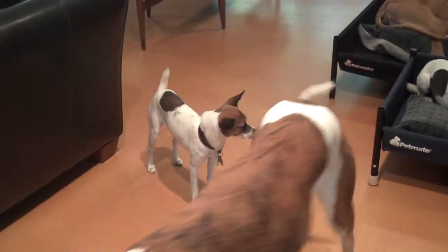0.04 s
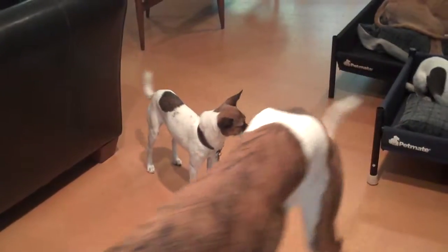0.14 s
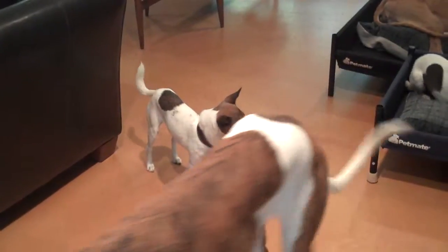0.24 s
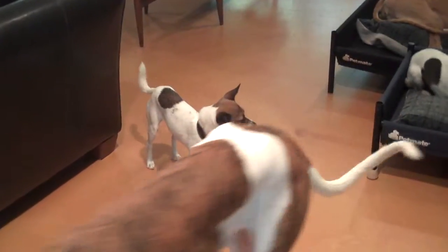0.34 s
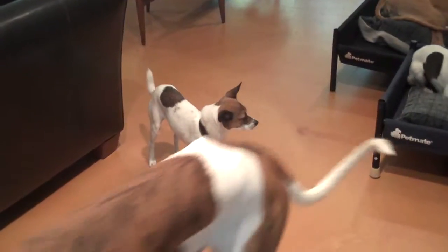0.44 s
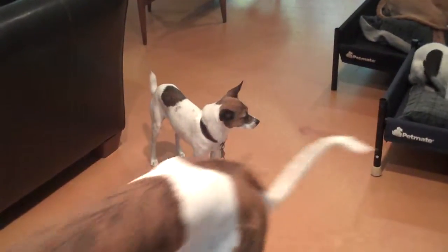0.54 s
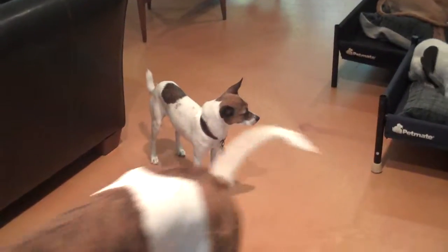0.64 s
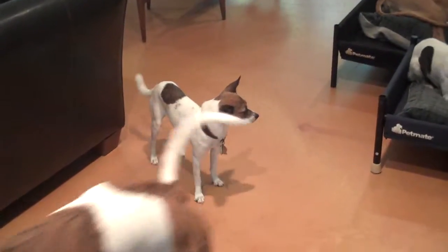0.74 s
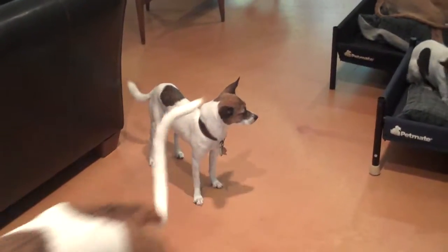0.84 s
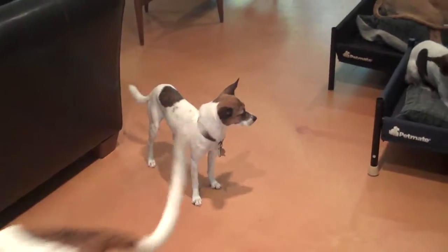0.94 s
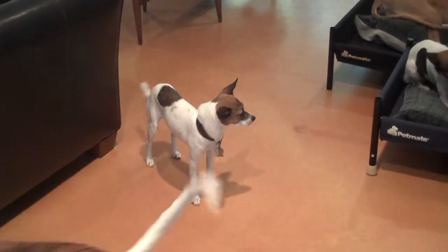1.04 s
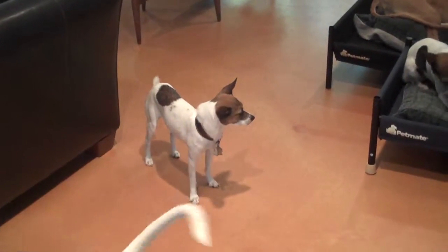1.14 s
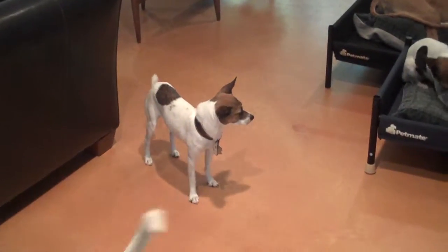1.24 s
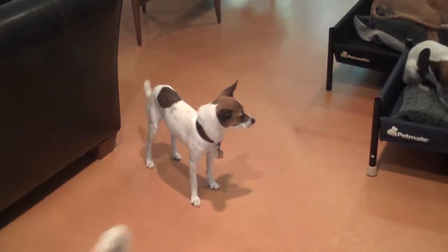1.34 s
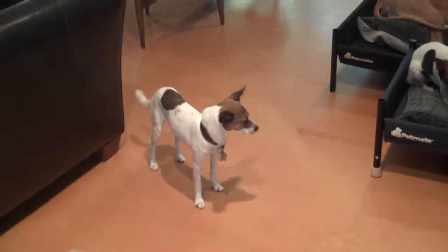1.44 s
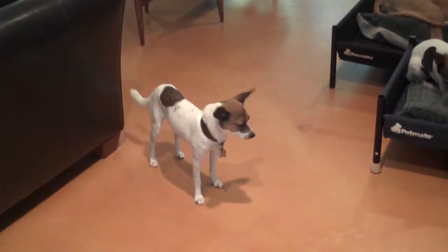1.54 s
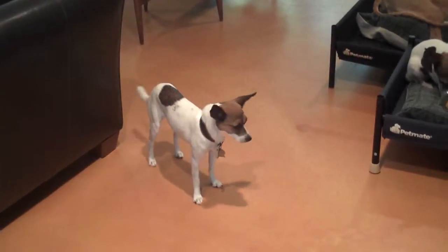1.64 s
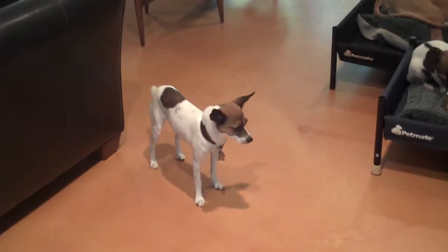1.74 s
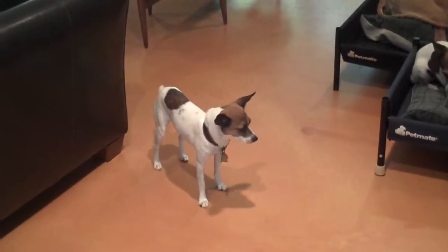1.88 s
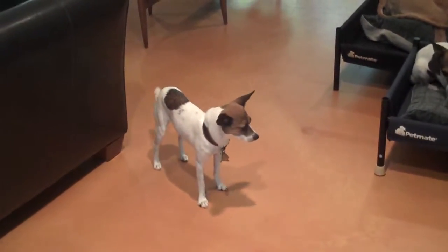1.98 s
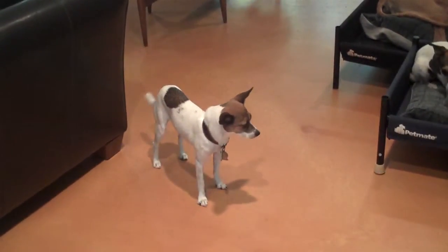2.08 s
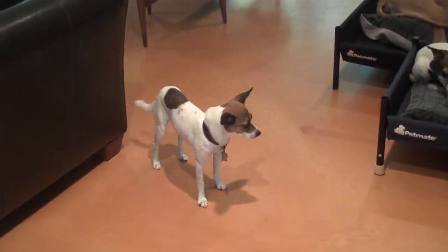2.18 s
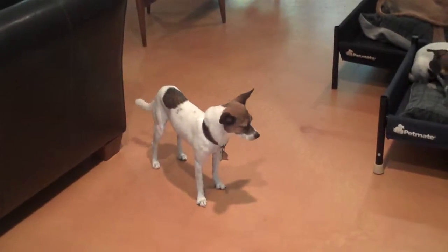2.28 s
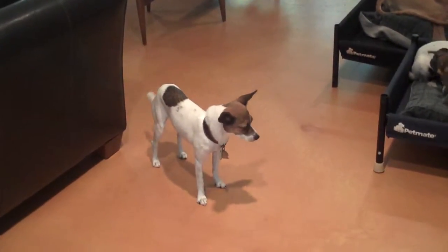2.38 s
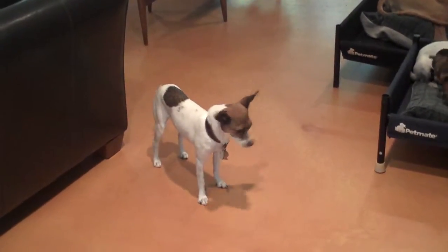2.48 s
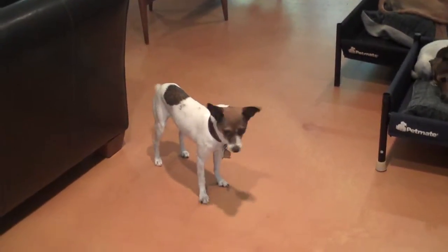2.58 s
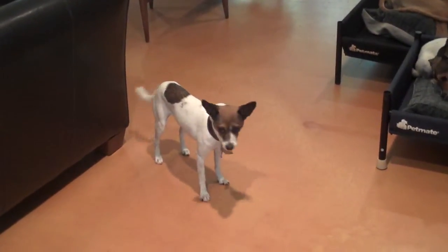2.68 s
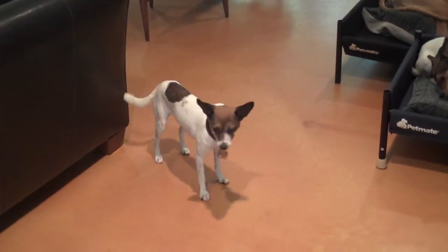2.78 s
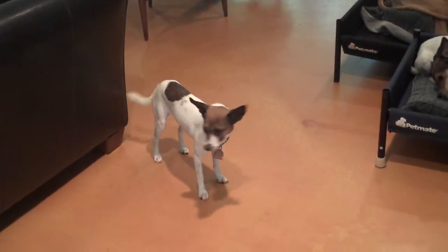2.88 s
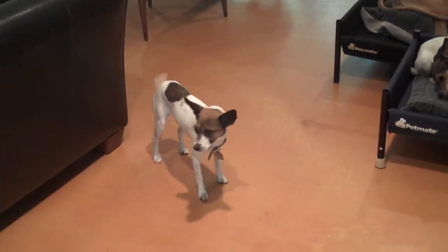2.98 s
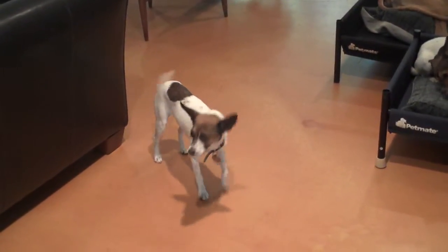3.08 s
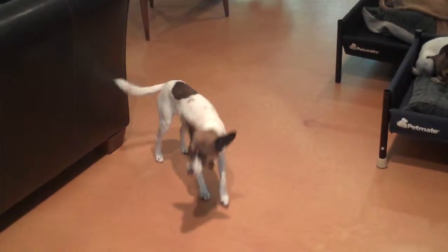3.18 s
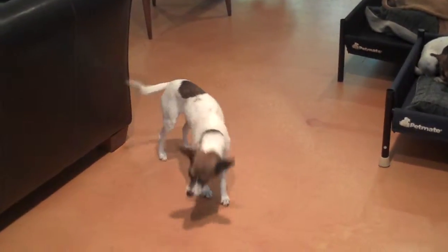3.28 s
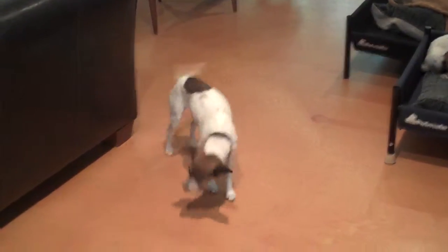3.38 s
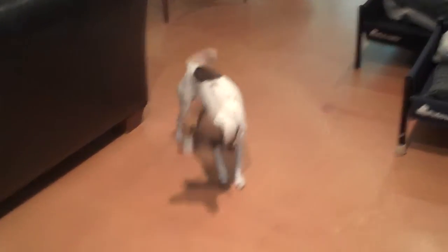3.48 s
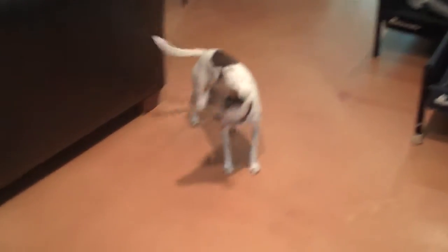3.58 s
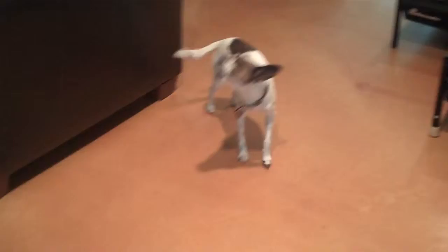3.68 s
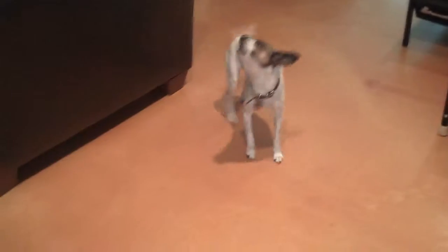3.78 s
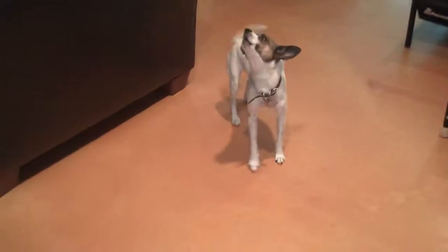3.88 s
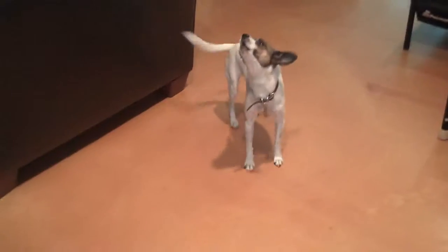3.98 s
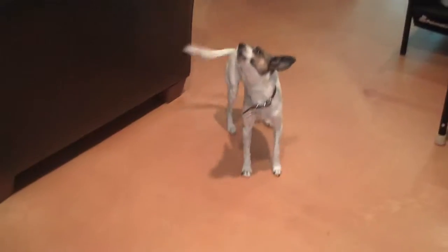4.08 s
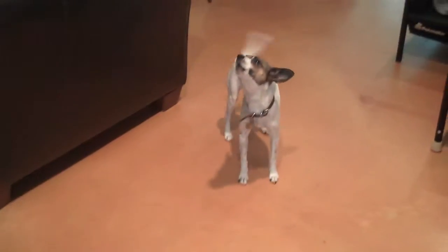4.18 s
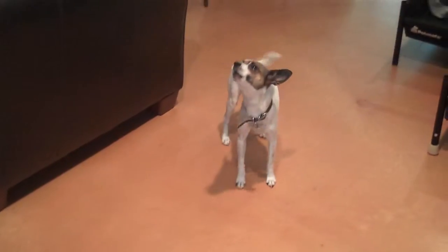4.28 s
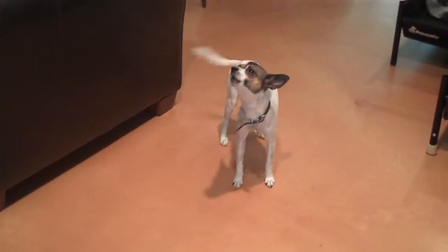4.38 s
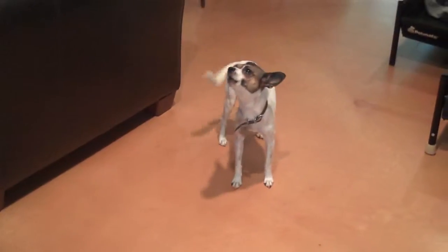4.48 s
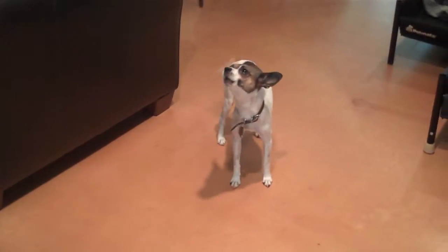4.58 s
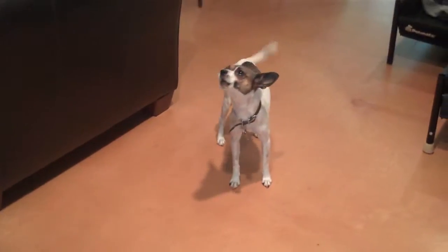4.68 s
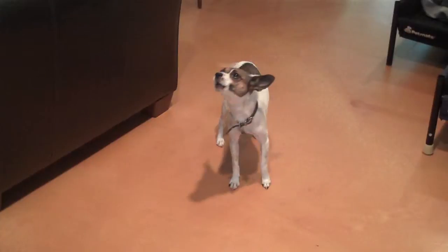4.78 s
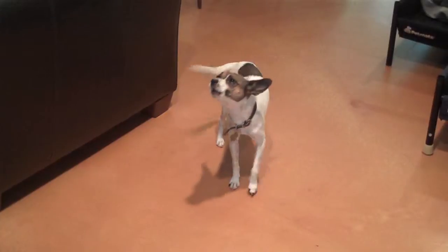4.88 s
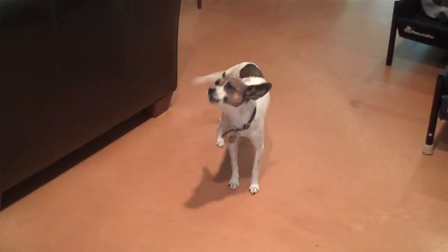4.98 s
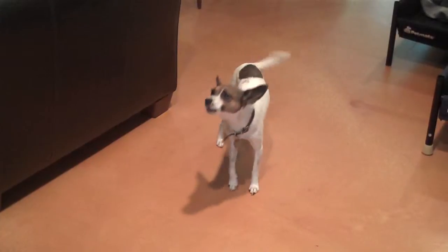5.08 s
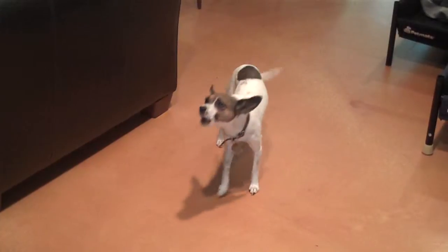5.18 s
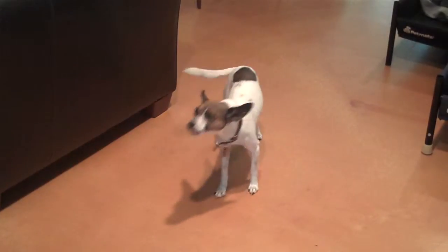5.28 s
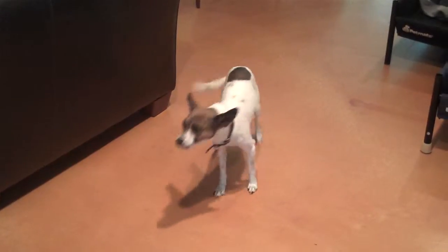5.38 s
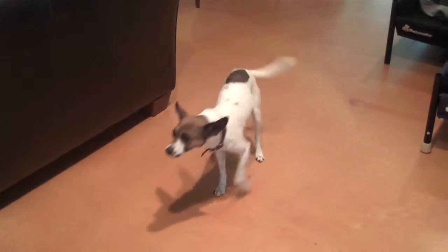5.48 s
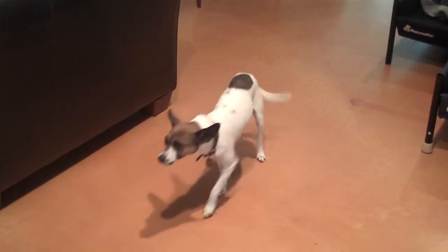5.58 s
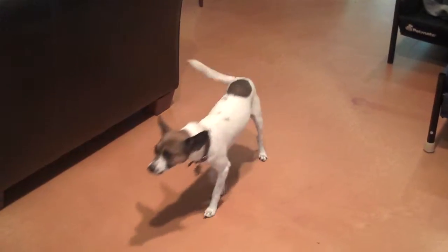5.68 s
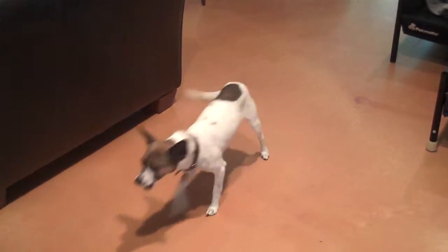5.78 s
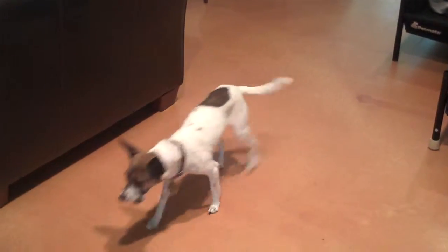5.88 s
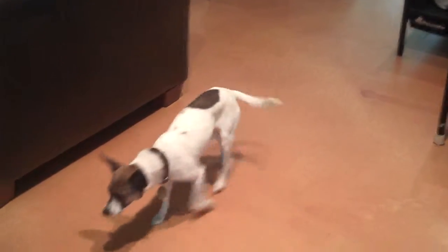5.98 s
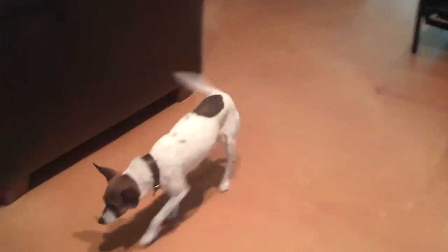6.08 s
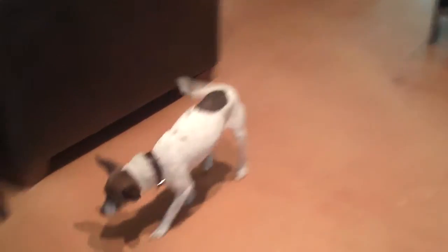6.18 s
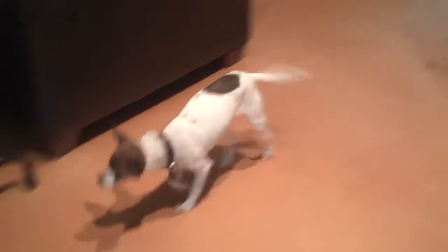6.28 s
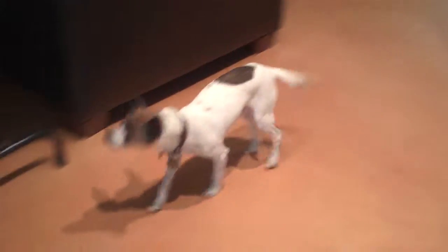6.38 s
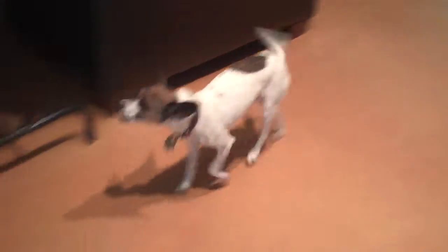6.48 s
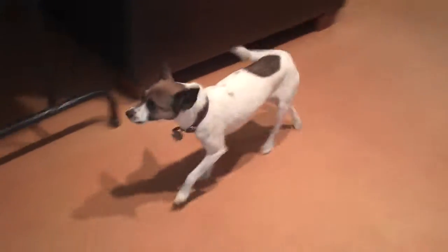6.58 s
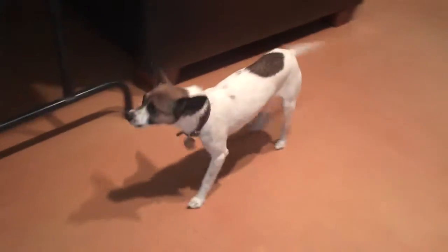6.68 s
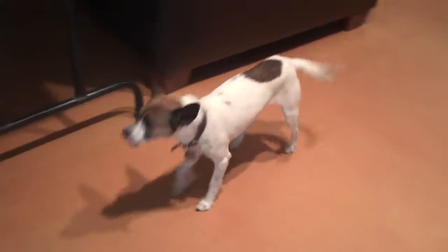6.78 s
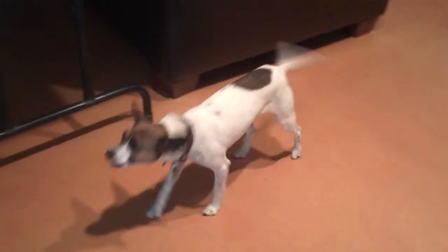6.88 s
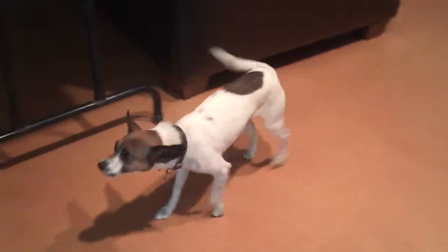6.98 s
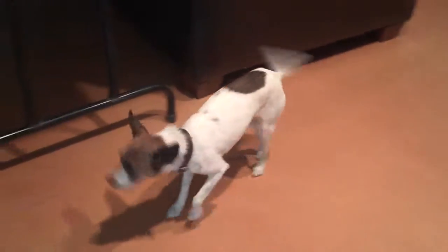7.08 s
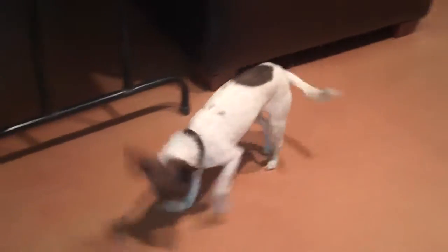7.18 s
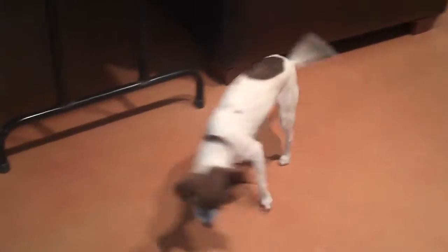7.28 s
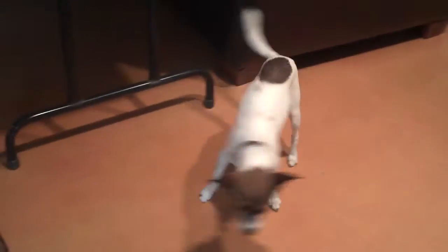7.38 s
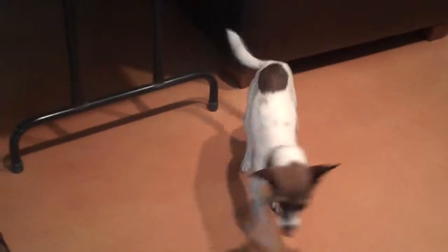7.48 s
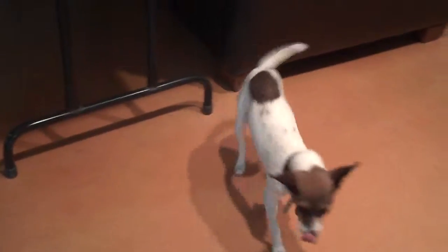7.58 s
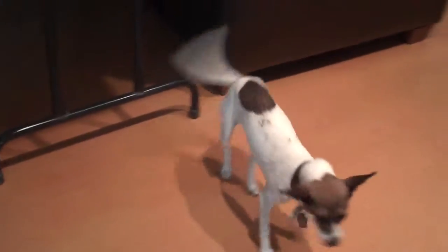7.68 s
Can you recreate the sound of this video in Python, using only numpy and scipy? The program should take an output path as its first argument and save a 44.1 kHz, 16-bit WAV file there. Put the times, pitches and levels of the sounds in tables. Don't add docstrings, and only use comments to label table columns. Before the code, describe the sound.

Indoors, dog nails click and tags tinkle before a loud yip, a long faint upward-flicking whine, a second yip and a snort.

```python
import sys
import numpy as np
from scipy import signal
from scipy.fft import rfft, irfft, next_fast_len
from scipy.io import wavfile
from scipy.ndimage import uniform_filter1d, minimum_filter1d, map_coordinates

SR = 44100
rng = np.random.default_rng(int(sys.argv[2]) if len(sys.argv) > 2 else 0)


def volts_from_db(level):
    exponent = np.asarray(level, float) / 20
    return 10 ** exponent


def inscribe(sig):
    pcm = np.round(np.clip(np.atleast_2d(sig).T, -1, 1) * 32767)
    wavfile.write(sys.argv[1], SR, pcm.astype(np.int16))


N = 341319
T = np.arange(N) / SR


def unit(x):
    return x / np.sqrt(np.mean(x ** 2) + 1e-20)


def along(points, hz):
    f, v = np.transpose(points)
    return np.interp(np.log(hz + 1), np.log(f + 1), v)


def curves(rows):
    s, *cols = np.transpose(rows)
    gate = np.clip(np.minimum(T - s[0], s[-1] - T) / 0.013, 0, 1)
    return [np.interp(T, s, c) for c in cols] + [gate]


def wobble(rate_hz, count=N):
    knots = rng.standard_normal(int(count * rate_hz / SR) + 4)
    return map_coordinates(knots, [T[:count] * rate_hz])


def hiss(spectrum):
    m = next_fast_len(N)
    colour = volts_from_db(along(spectrum, np.fft.rfftfreq(m, 1 / SR)))
    return unit(irfft(rfft(rng.standard_normal(m)) * colour, m)[:N])


def passed(x, hz, kind, order):
    return signal.sosfilt(signal.butter(order, min(hz, 20000), kind, fs=SR, output="sos"), x)


def swell(t, rise_s):
    return 1 - np.exp(-t / rise_s)


def puffs(rows, rise_s):
    envelope = 0
    for s, db, t60 in rows:
        since = (T - s).clip(0)
        envelope = envelope + volts_from_db(db - 60 * since / t60) * swell(since, rise_s)
    return envelope


def add(track, s, sound):
    part = track[round(s * SR):][:len(sound)]
    part += sound[:len(part)]


# (frequency [Hz], t60 [s])
WALL_DECAY = [(300, 0.42), (800, 0.54), (2000, 0.6), (5500, 0.49), (12000, 0.32)]


def room(x, wet_db):
    hz, t, z = signal.stft(rng.standard_normal(SR), SR, nperseg=256)
    fall_db = -60 * t / along(WALL_DECAY, hz)[:, None]
    tail = signal.istft(z * (volts_from_db(fall_db) + volts_from_db(-19.5 + 0.41 * fall_db)), SR, nperseg=256)[1]
    tail = np.pad(tail / np.linalg.norm(tail), (round(0.0034 * SR), 0))
    return x + volts_from_db(wet_db) * signal.fftconvolve(x, tail)[:N]


# (frequency [Hz], level [dB])
BREATH = [(250, -34), (600, -6), (1000, 0), (1850, -3), (2200, -20), (3300, -18), (6800, -32), (9000, -18),
          (11500, -24), (14000, -40)]
WHINE_DIP_HALF_WIDTH_S = 0.0064


def call(rows, mouth, jitter, flutter, side, rasp_db, side_db, breaks=(), waver_db=3.5, swing_db=1.2):
    span = slice(round(rows[0][0] * SR), round(rows[-1][0] * SR))
    hz, db, open_db, gate = (c[span] for c in curves(rows))
    over_db = db + open_db
    for s, depth_db in breaks:
        db = db - depth_db * np.exp(-((T[span] - s) / WHINE_DIP_HALF_WIDTH_S) ** 2)

    def drift(rate_hz):
        return wobble(rate_hz, count=len(hz))

    phase = 2 * np.pi * np.cumsum(hz * (1 + jitter * drift(90))) / SR + flutter * drift(450)
    tone = volts_from_db(db + swing_db * drift(26)) * np.sin(phase)
    tone += volts_from_db(over_db + side_db + 2 * drift(60)) * np.sin(side * phase + .9 * drift(120))
    for k in range(2, 10):
        overtone_db = along(mouth, k * hz) + over_db + waver_db * drift(34)
        tone += volts_from_db(overtone_db) * np.sin(k * phase + (k - 2) ** 2 + 1.7)
    rasp = volts_from_db(over_db + rasp_db) * hiss(BREATH)[span] * (1 + .6 * np.sin(phase))
    out = np.zeros(N)
    out[span] = gate * (np.sqrt(2) * tone + rasp)
    return out


# (time [s], pitch [Hz], level [dB], mouth opening as overtone level [dB])
YIP_1_LEAD = [
    (3.645, 535, -58.5, -20.5),
    (3.668, 580.4, -50.5, -14.5),
    (3.677, 890, -23, -2),
    (3.684, 958, -13, -7),
    (3.69, 1042, -13, -14),
    (3.7, 1000, -34, -14),
]
YIP_1 = [
    (3.68, 767, -39.5, -15),
    (3.691, 792, 0, -14),
    (3.702, 853, -3.5, -15.5),
    (3.733, 787, -5.5, -15),
    (3.746, 795.3, -4, -16),
    (3.756, 794.6, -11, -17.5),
    (3.785, 830, -18, -18),
    (3.805, 815, -41, -15),
]
YIP_1_TRAIL = [
    (3.752, 960, -36, -10),
    (3.768, 1020, -21, -12),
    (3.79, 1040, -19, -14),
    (3.806, 990, -34, -8),
    (3.822, 930, -24, -10),
    (3.85, 990, -25, -13),
    (3.88, 940, -36, -14),
]
WHINE = [
    (3.86, 944, -36, -17.5),
    (4.07, 902.4, -35, -22.5),
    (4.3, 925.7, -33.5, -25),
    (4.55, 902, -40.5, -16.5),
    (4.64, 875, -31.5, -26.5),
    (4.76, 872, -27, -31.5),
    (4.86, 812, -26.5, -30.5),
    (4.95, 842, -22.5, -24.5),
    (5.19, 736, -28, -34),
]
FLICK = [
    (5.17, 734.5, -30, -36),
    (5.215, 794.6, -16, -42),
    (5.235, 861, -22.5, -19.5),
    (5.262, 1029, -14.5, -17.5),
    (5.285, 1096, -21, -9),
    (5.315, 1097, -22.5, -11),
    (5.338, 1003, -21, -15),
    (5.375, 903, -23, -27),
    (5.42, 835, -34, -39),
]
YIP_2 = [
    (6.458, 641.5, -46, -30),
    (6.468, 665, -26.5, -25),
    (6.48, 722, -14, -17),
    (6.486, 731, -26, -10),
    (6.494, 706, -12, -13),
    (6.506, 765, -14, -4.5),
    (6.514, 784, -5, -14),
    (6.527, 822, -8, -16),
    (6.537, 792, -35, 2),
]
YIP_2_TRAIL = [
    (6.52, 1173, -30, -24.5),
    (6.55, 1154, -16, -27.5),
    (6.562, 1082, -26, -22),
    (6.575, 1015, -14.5, -34.5),
    (6.6, 1056, -37, -27),
]
# (time [s], depth [dB])
WHINE_DIPS = [(4.0, 2.5), (4.198, 16.5), (4.408, 30), (4.418, 14), (4.52, 8), (4.588, 29.5), (4.61, 14),
              (4.666, 7.5), (4.715, 7.5), (4.78, 7), (4.817, 7.5), (4.85, 6), (5.052, 8.5), (5.08, 12),
              (5.1, 11.5), (5.148, 4)]
# (time [s], peak [dB], t60 [s])
CATCHES = [
    (4.72, -48, 0.54),
    (4.83, -56, 0.7),
]
# (frequency [Hz], level [dB])
OPEN_MOUTH = [(1300, 8), (1600, 1.5), (2000, -11.5), (2400, -31), (3200, -30.5), (4200, -45.5), (8000, -34),
              (12000, -50)]
SHUT_MOUTH = [(1500, -1.5), (1800, 0.5), (2300, -18.5), (2480, -17), (2760, -9), (3330, -17), (3480, -34),
              (7400, -22.5), (9000, -32)]
THIN_MOUTH = [(1500, 0), (2100, -12), (2500, -22.5), (3200, -27), (4100, -32), (5300, -50), (8000, -40),
              (11000, -47)]


def voice():
    first = call(YIP_1_LEAD, OPEN_MOUTH, .015, .12, 1.5, -6, -50)
    first += call(YIP_1, OPEN_MOUTH, .007, .05, 1.27, -14, -6, waver_db=2.5)
    first += call(YIP_1_TRAIL, OPEN_MOUTH, .025, .2, 1.83, -3, 2, swing_db=3)
    second = call(YIP_2, OPEN_MOUTH, .013, .1, 1.48, -14, -14, waver_db=3)
    second += call(YIP_2_TRAIL, OPEN_MOUTH, .04, .35, .72, 3, 18)
    catch = passed(puffs(CATCHES, .004) * hiss(BREATH), 1450, "low", order=6)
    catch = passed(catch, 1100, "high", order=4)
    whine = call(WHINE, SHUT_MOUTH, .004, .012, 1.5, -22, -22, WHINE_DIPS, waver_db=4)
    whine = room(whine + catch, wet_db=-14)
    flick = call(FLICK, THIN_MOUTH, .014, .07, 1.3, -14, -7, waver_db=5.5, swing_db=3)
    calls = room(first, wet_db=-11) + room(second, wet_db=-7) + whine + room(flick, wet_db=-5)
    return passed(calls, 340, "high", order=4)


# (time [s], level [dB])
GRUNT = [
    (6.6, -63.5),
    (6.99, -59.5),
    (7.024, -47.5),
    (7.122, -47),
    (7.154, -54),
    (7.252, -49),
    (7.29, -60),
]
SNORT = [
    (7.24, -70),
    (7.247, -49.5),
    (7.29, -54),
    (7.302, -44),
    (7.322, -36),
    (7.334, -40),
    (7.37, -44.5),
    (7.45, -63.5),
]
# (frequency [Hz], density [dB per Hz])
NOSTRILS = [(240, -17.5), (400, -6), (781, -7), (867, -2.5), (1180, 0.5), (4730, -3), (5170, 3.5),
            (5570, -2.5), (12600, -14), (14000, -28)]


def nose():
    chest = [(120, -36.5), (260, -14), (330, -19), (480, -2.5), (620, -19.5), (800, -8),
             (1100, -15.5), (2500, -44)]
    db, gate = curves(GRUNT)
    grunt = gate * volts_from_db(db + 2 * wobble(45)) * hiss(chest)
    db, gate = curves(SNORT)
    snort = gate * volts_from_db(db + 4 * wobble(160)) * hiss(NOSTRILS)
    return room(grunt + snort, wet_db=-4.5)


# (time [s], level [dB], length [s], centre [Hz], width [Hz])
GASPS = [(5.235, -52, .1, 11400, 700), (5.24, -58, .09, 7700, 890), (5.24, -61, .08, 8000, 500),
         (5.25, -58, .08, 12900, 900), (5.225, -56.5, .04, 2600, 2500), (6.425, -52, .04, 550, 600),
         (6.447, -41, .035, 950, 1200), (6.465, -48, .07, 3300, 1400), (6.355, -56.5, .035, 720, 470),
         (3.655, -50, 0.02, 800, 905), (7.31, -38.5, 0.025, 4300, 1600), (7.314, -42, 0.02, 5200, 500),
         (6.06, -62, .2, 2250, 350), (0.736, -47.5, 0.031, 1830, 2300), (0.115, -57, .12, 3400, 600),
         (0.92, -59, 0.036, 7600, 4000)]


def gasps():
    out = np.zeros(N)
    for s, db, length_s, hz, width_hz in GASPS:
        t = T[:round(length_s * SR)]
        edges_hz = hz * np.exp(np.array([-.5, .5]) * width_hz / hz)
        band_pass = signal.butter(2, edges_hz, "band", fs=SR, output="sos")
        band = unit(signal.sosfilt(band_pass, rng.standard_normal(len(t))))
        add(out, s, volts_from_db(db + 3 * wobble(150, count=len(t))) * np.sin(np.pi * t / length_s) ** 1.2 * band)
    return room(out, wet_db=-9.5)


def tag(hits, modes, dull_hz, blur):
    out, t = np.zeros(N), T[:SR // 3]
    hz, level_db, t60 = np.transpose(modes)[..., None]
    for s, db, clatter_db, low_db in hits:
        swing = blur * np.cumsum(rng.standard_normal((len(modes), len(t))), axis=1)
        strength_db = level_db + rng.normal(0, 3, hz.shape) + (low_db + 8) * (hz == hz.min())
        decay = volts_from_db(strength_db - 60 * t / np.minimum(t60, .38))
        ring = np.sum(decay * np.sin(2 * np.pi * hz * t + swing), axis=0)
        crack = passed(rng.standard_normal(len(t)), dull_hz, "high", order=4) * volts_from_db(-60 * t / 0.11)
        add(out, s, volts_from_db(db - 10.5) * swell(t, 0.0014) * (ring + volts_from_db(clatter_db) * crack))
    return out


# (time [s], peak [dB], clatter [dB], lowest mode lift [dB])
ROUND_TAG_HITS = [(0.4169, -41, -2, -15), (0.6589, -34, -2.5, -32), (1.9335, -37.5, 5, -9.5),
                  (2.3209, -31, 0, -18), (2.7883, -48.5, 4, -5.5), (3.1906, -31, -5.5, -13.5),
                  (3.2156, -32, -5, -12.5), (3.564, -34, -1, -7.5), (3.9795, -52.5, -2, -16.5),
                  (4.1099, -42, -2, -25), (4.4551, -36, -2, -14), (4.8769, -40, 5, -26),
                  (5.3416, -37, 7.5, -15), (5.4949, -40, 0.5, -22), (5.6276, -40, -3, -24),
                  (5.8355, -34.5, -0.5, -15), (7.3177, -37.5, 2.5, -6)]
BONE_TAG_HITS = [(2.6354, -49, -11, -12), (2.8816, -54, -14, -3.5), (3.456, -47.5, -13.5, -2.5),
                 (3.6083, -35.5, -22.5, -15.5), (3.6558, -36, -9, -10), (4.0681, -46, -10, -2),
                 (4.2448, -43.5, 5.5, -6), (5.5139, -39, -4.5, -18.5), (6.1399, -52.5, -30, -7.5),
                 (6.289, -41.5, -4, -7.5), (6.4435, -29, -12, -17.5), (6.6913, -53, -15, -21.5),
                 (6.8753, -48.5, -5.5, -4.5), (6.9638, -44.5, -8.5, -5.5), (7.5782, -60, -13, 12),
                 (7.6366, -31, -2.5, -10.5)]
RING_HITS = [
    (0.1755, -41, -4, -21),
    (0.271, -47.5, -15, 2),
    (0.8555, -41.5, -9, -16),
    (1.8525, -40.5, -24.5, -18),
    (2.6923, -39, -2, -10),
]
# (frequency [Hz], level [dB], t60 [s])
ROUND_TAG = [(5185, 1, 0.33), (6100, -21, 0.75), (6430, -18, .15), (9950, -15.5, 0.06), (10310, -1, 0.075),
             (10830, -14.5, 0.59), (11600, -13, 0.34), (11500, -12, 0.14), (12850, -9, .1)]
BONE_TAG = [(6090, -1.5, 0.8), (6870, -2.5, 0.77), (8200, -17, 0.15), (8085, -29.5, 0.72),
            (12380, -13, 0.57), (12600, -2.5, 0.21)]
RING = [(7700, -8, .2), (8000, -11, 0.088), (10070, -8, 0.16), (13050, -1.5, 0.26)]


def collars():
    far = room(tag(ROUND_TAG_HITS, ROUND_TAG, dull_hz=4500, blur=0.055), wet_db=3)
    near = tag(BONE_TAG_HITS, BONE_TAG, dull_hz=6130, blur=0.045)
    near += tag(RING_HITS, RING, dull_hz=9100, blur=0.11)
    return far + room(near, wet_db=-4.5)


# (time [s], peak [dB], ring [Hz], brightness [dB])
CLAWS = [(0.088, -41.5, 4450, 6.5), (0.113, -38.5, 1600, -18.5), (0.381, -42, 2260, -26),
         (0.5133, -36, 5540, -7.5), (0.6736, -36, 1850, -21), (0.754, -36, 3100, -14),
         (0.9207, -40, 3200, -19), (0.9768, -42.5, 2830, -11.5), (1.1415, -43.5, 2450, -14),
         (1.203, -43.5, 3500, -18), (1.243, -47, 2330, -7), (1.283, -33.5, 2580, -19),
         (1.3154, -35, 3200, -32), (1.4254, -31.5, 2720, -8), (1.492, -34, 2600, -14),
         (1.5597, -20, 2720, -20.5), (1.746, -35, 2520, -16), (1.814, -41, 2600, -31),
         (1.965, -41, 3550, -19), (2.1036, -45.5, 2380, 3.5), (2.2428, -41.5, 2350, -12),
         (2.5607, -39, 2480, -15), (3.3784, -46, 2290, -12.5), (6.0458, -49, 2290, -26.5),
         (6.0846, -45.5, 2066, -27), (6.2558, -41, 2426, -8.5), (7.245, -39, 2180, -21.5),
         (7.3, -29, 3500, -19)]
# (frequency [Hz], level [dB])
NAIL_MODES = [(2600, -12), (3400, -1), (4500, -10), (5800, -4.5), (6900, 2.5)]


def claws():
    out, t = np.zeros(N), T[:SR // 20]
    for s, db, hz, bright_db in CLAWS:
        noise = rng.standard_normal((2, len(t)))
        floor = 0
        for f, level_db in NAIL_MODES:
            floor = floor + volts_from_db(level_db + rng.normal(0, 3)) * np.sin(2 * np.pi * f * rng.normal(1, .03) * t)
        tick = .5 * np.sin(2 * np.pi * hz * t) * volts_from_db(-60 * t / .015)
        tick += .35 * floor * volts_from_db(-60 * t / .01) + .55 * noise[0] * volts_from_db(-60 * t / .022)
        edge = np.diff(noise[1], prepend=0) * volts_from_db(bright_db - 60 * t / .005)
        add(out, s, volts_from_db(db - 1) * (passed(tick, 8000, "low", order=2) + edge))
    return room(passed(out, 1900, "high", order=4), wet_db=-1.5)


# (time [s], peak [dB], body [Hz], knock [dB])
PATS = [(0.055, -42, 456, -9), (0.129, -35, 328, -33), (0.173, -51, 346, -14), (0.378, -45.5, 346, -8),
        (0.657, -42.5, 644, -29), (0.759, -40.5, 331, -13), (0.929, -48.5, 610, -5), (1.058, -58, 352, -1),
        (1.143, -41.5, 330, -3), (1.238, -42, 328, -13), (1.287, -30.5, 630, -28), (1.315, -42.5, 486, -11),
        (1.5, -47, 424, -5), (1.531, -42.5, 324, -17), (1.648, -43, 333, -7.5), (1.697, -46, 335, -5.5),
        (1.771, -49.5, 333, -15), (2.074, -50.5, 320, 0), (2.161, -46.5, 339, -12.5), (2.58, -54, 322, -18),
        (3.054, -52.5, 340, -10), (3.568, -51.5, 543, -7.5), (5.483, -39.5, 540, -8),
        (6.258, -52.5, 400, -5), (7.718, -50.5, 408, -11.5),
        (5.089, -51, 292, -13),
    (5.347, -44, 380, -28),
]
# (time [s], peak [dB], t60 [s])
SCUFFS = [
    (.04, -53.5, 0.13),
    (.112, -37, 0.17),
    (.655, -62, 0.67),
    (.737, -38.5, 0.2),
    (6.085, -51.5, 0.059),
    (6.1, -61, 1.65),
    (6.37, -56, 0.19),
]
# (frequency [Hz], level [dB])
SOLE = [(100, -44), (250, -10), (900, 4.5), (1900, 2.5), (3000, -5.5), (5000, -13.5), (12000, -22)]


def pats():
    out, t = np.zeros(N), T[:SR // 4]
    for s, db, hz, knock_db in PATS:
        knock = passed(rng.standard_normal(len(t)), 1200, "low", order=2)
        knock = passed(knock, 300, "high", order=2) * volts_from_db(knock_db + 12.5 - 60 * t / 0.077)
        body = volts_from_db(-60 * t * hz / 22) * np.sin(2 * np.pi * hz * t)
        add(out, s, volts_from_db(db) * swell(t, 0.00085) * (body + knock))
    scuffs = puffs(SCUFFS, rise_s=0.0016) * volts_from_db(-9 + 9.1 * wobble(70)) * hiss(SOLE)
    return room(passed(out + scuffs, 190, "high", order=4), wet_db=0)


# (time [s], peak [dB], ring [Hz], t60 [s])
KNOCKS = [(0.112, -38, 1800, 0.051), (1.5585, -30, 2500, 0.03), (1.5605, -30.5, 4400, 0.017),
          (0.078, -43, 5600, 0.0086), (1.586, -39, 4500, 0.011), (5.4, -49, 2050, .04),
          (6.086, -48, 1100, .03), (7.2, -55, 2270, 0.0399), (7.1, -50, 1950, 0.039),
          (6.376, -54, 1640, 0.0302), (6.285, -49, 230, .06), (6.305, -51.5, 250, .06),
          (6.372, -53, 280, 0.055), (7.7, -54, 406, .05), (0.6067, -49, 2470, .012),
          (1.1415, -46.5, 1050, 0.028), (1.1804, -44, 5400, .006), (1.218, -48, 10000, .015),
          (1.244, -48, 10200, .015), (1.4, -43.5, 950, .025), (0.95, -53, 1050, 0.036),
          (6.5, -33, 3600, 0.0087), (7.268, -44, 2200, .008), (7.252, -42, 4700, .012),
          (3.02, -58, 8500, .006), (3.058, -58, 9500, .006), (2.664, -54, 12000, .006),
          (5.342, -38, 12500, .006)]


def knocks():
    out, t = np.zeros(N), T[:SR // 8]
    for (s, db, hz, t60), (detune, start) in zip(KNOCKS, rng.random((len(KNOCKS), 2))):
        upper = np.sin(2 * np.pi * (hz * (1.1 + .08 * detune) * t + start))
        pair = np.sin(2 * np.pi * hz * t) + 0.68 * upper
        add(out, s, volts_from_db(db - 60 * t / t60) * swell(t, .0007) * pair)
    return room(out, wet_db=0)


# (time [s], recovery [s], offset dip [full scale], overshoot [full scale])
OVERLOADS = [
    (3.72, 1.33, .009, .0024),
    (5.25, .5, .001, .0003),
    (6.52, .87, .008, .0028),
]
REST_OFFSET, DIP_S, SETTLE_S = -.0004, .12, .13
DUCK_DB, DUCK_S = -8, .08


def upset():
    duck_db, offset = 0, REST_OFFSET
    for s, back_s, dip, over in OVERLOADS:
        since = (T - s).clip(0)
        duck_db = duck_db + DUCK_DB * swell(since, DUCK_S) * (1 - (since / back_s) ** 2).clip(0)
        creep = over * np.minimum(since / back_s, 1) * np.exp(-(since - back_s).clip(0) / SETTLE_S)
        offset = offset + creep - dip * np.exp(-since / DIP_S) * (since / .02).clip(0, 1)
    return duck_db, offset


# (frequency [Hz], density [dB per Hz])
AIR = [(12, -40.5), (20, 3.5), (54, -14), (445, -5), (841, -10), (1510, -8), (1640, -11.5), (1880, -8),
       (4690, -15.5), (5240, -14.5), (11400, -22), (13100, -23), (15000, -44.5)]
AIR_DB = -61


def air():
    duck_db, _ = upset()
    noise = volts_from_db(AIR_DB + wobble(1.7)) * hiss(AIR)
    hum = volts_from_db(-72.5 + 2 * wobble(3)) * np.sin(2 * np.pi * 1636 * T)
    return volts_from_db(duck_db) * (noise + hum)


def scene():
    jingle = collars()
    feet = claws() + pats()
    house = air()
    dog = voice() + nose() + gasps()
    return (dog + jingle + feet + knocks() + house)[None]


def band_limit(x):
    return signal.sosfilt(signal.butter(12, 15640, fs=SR, output="sos"), x)


TOP_HZ, CEILING = 13900, .715
HEADROOM = 1.3
BEND, BEND_FROM_POWER = 0.11, .06


def record(dry):
    sound = irfft(rfft(dry) * (np.fft.rfftfreq(N, 1 / SR) < TOP_HZ), N)
    lean = passed(np.clip(sound ** 2 - BEND_FROM_POWER, 0, .4), 170, "low", order=2)
    sound = sound - BEND * passed(lean, 22, "high", order=2)
    needed = np.minimum(1, HEADROOM * CEILING / (np.abs(sound) + 1e-9))
    gain = uniform_filter1d(minimum_filter1d(needed, size=120, axis=1), size=120, axis=1)
    _, offset = upset()
    mix = np.clip(sound * gain + offset, -CEILING, CEILING)
    return band_limit(mix)


dry = scene()
out = record(dry)
inscribe(out)
```